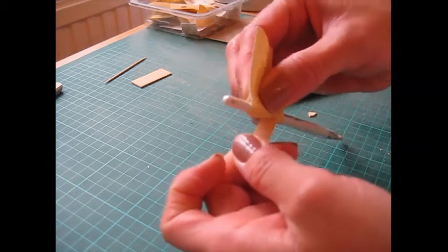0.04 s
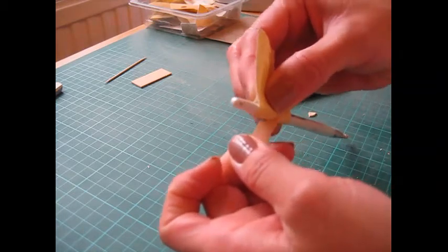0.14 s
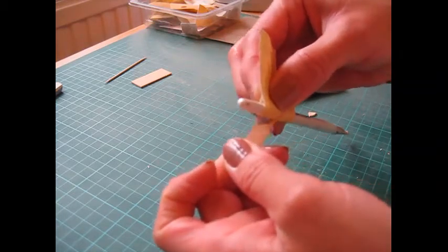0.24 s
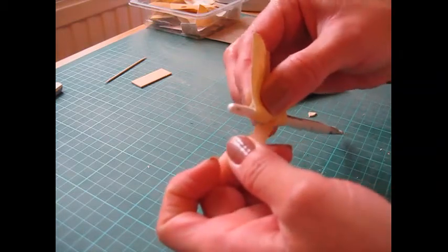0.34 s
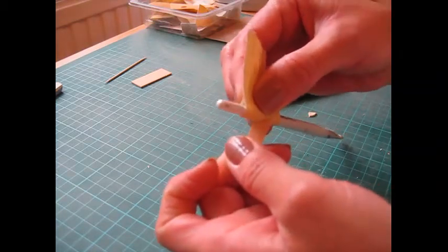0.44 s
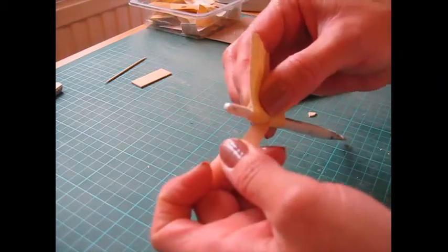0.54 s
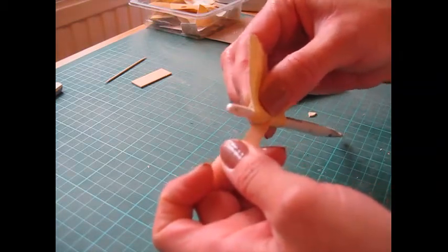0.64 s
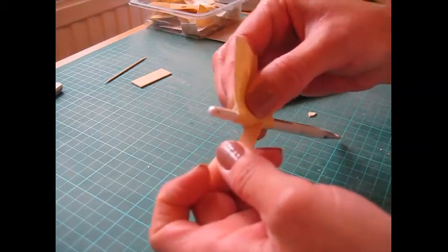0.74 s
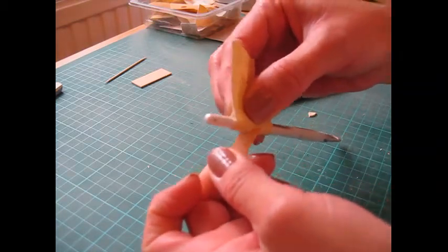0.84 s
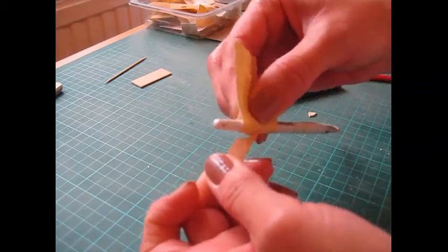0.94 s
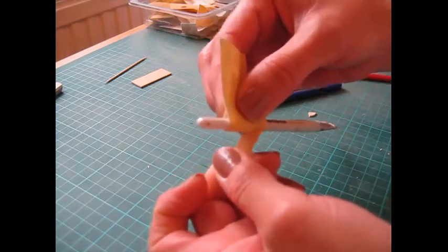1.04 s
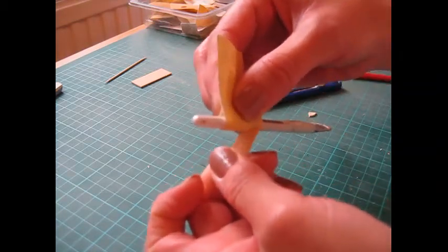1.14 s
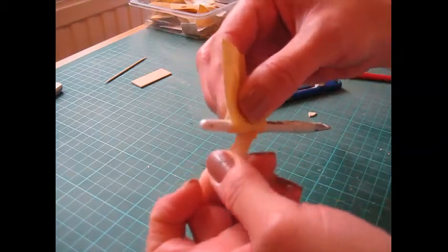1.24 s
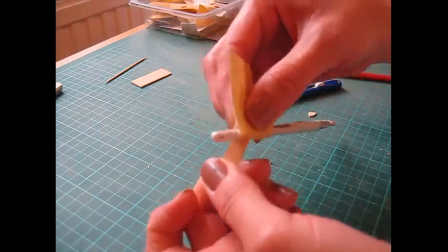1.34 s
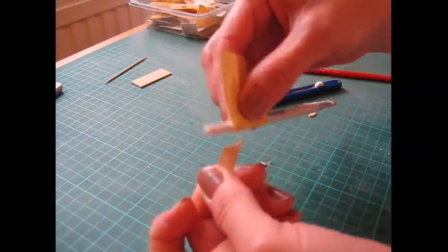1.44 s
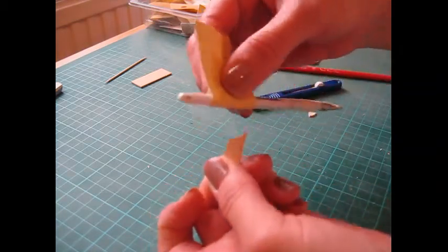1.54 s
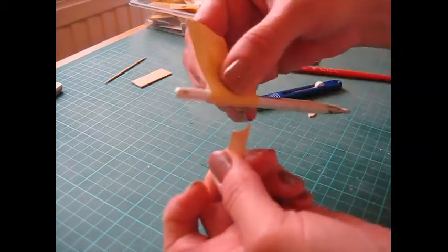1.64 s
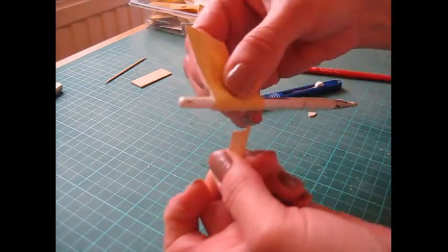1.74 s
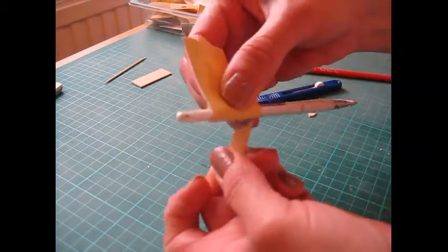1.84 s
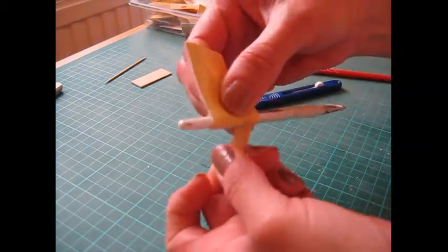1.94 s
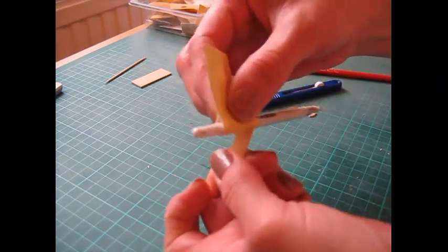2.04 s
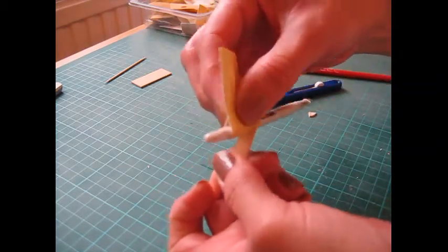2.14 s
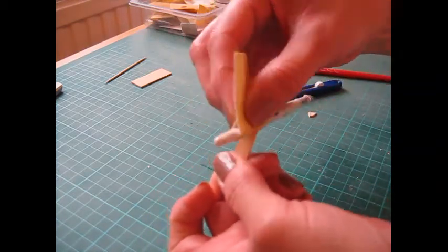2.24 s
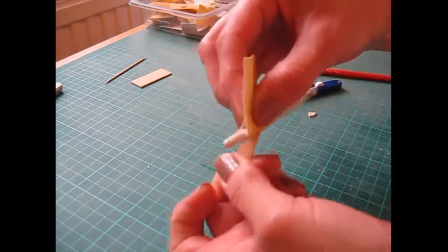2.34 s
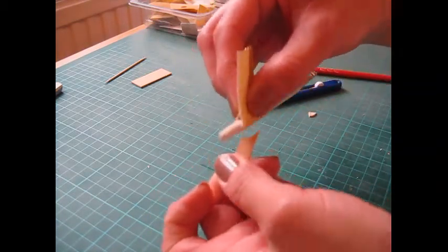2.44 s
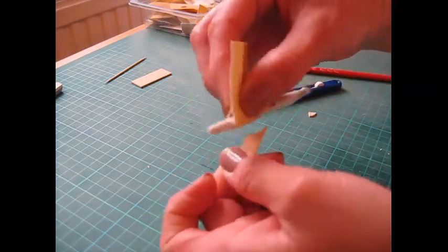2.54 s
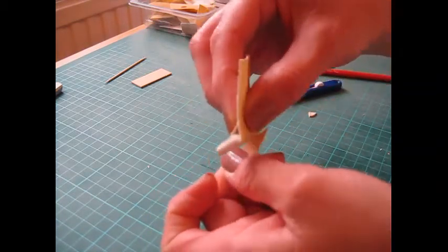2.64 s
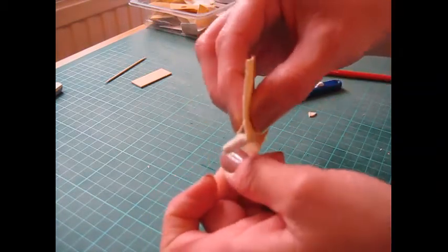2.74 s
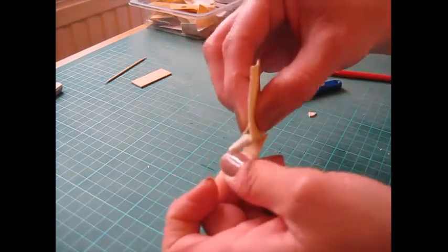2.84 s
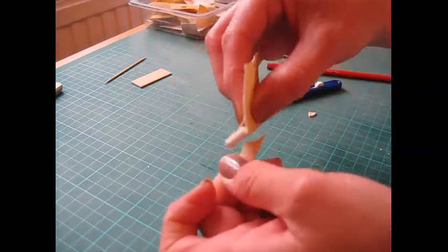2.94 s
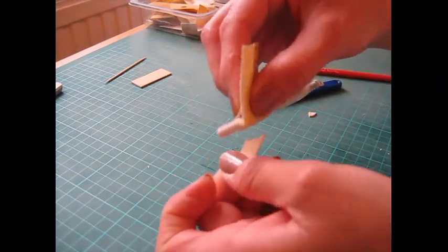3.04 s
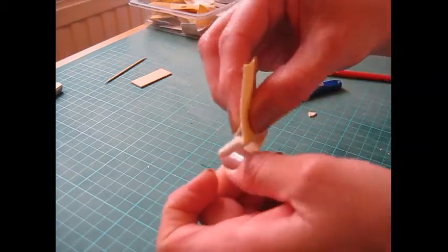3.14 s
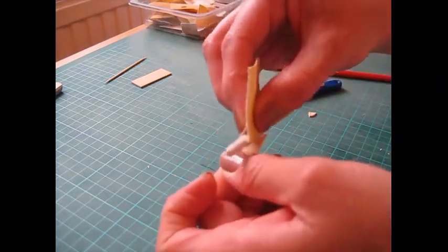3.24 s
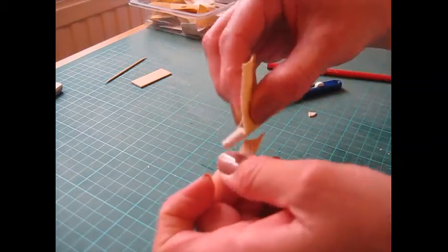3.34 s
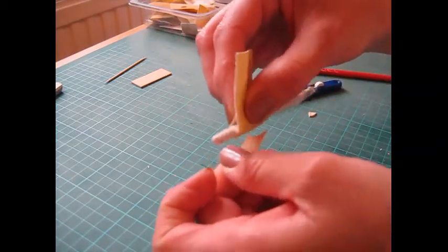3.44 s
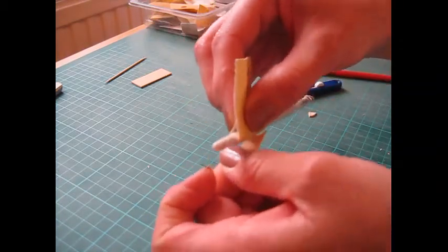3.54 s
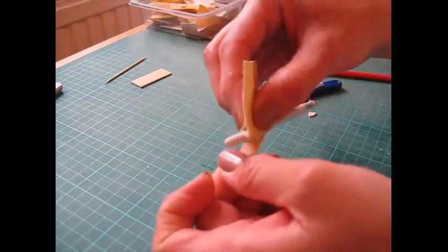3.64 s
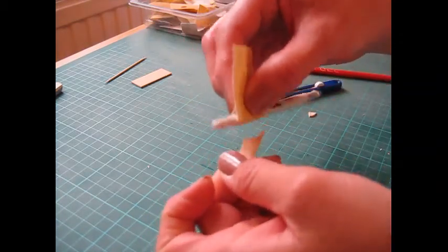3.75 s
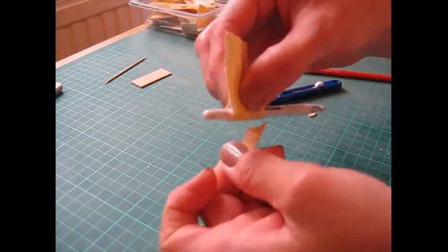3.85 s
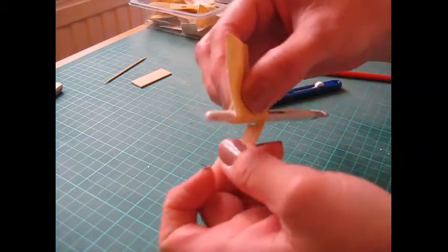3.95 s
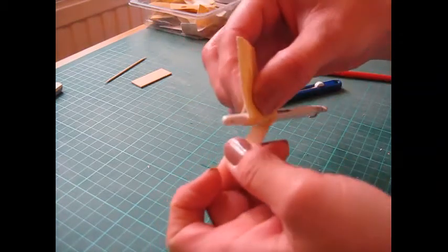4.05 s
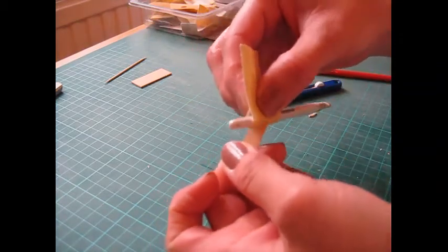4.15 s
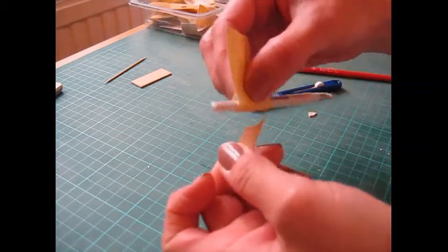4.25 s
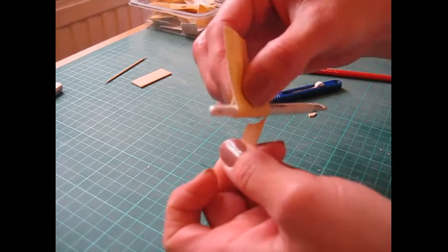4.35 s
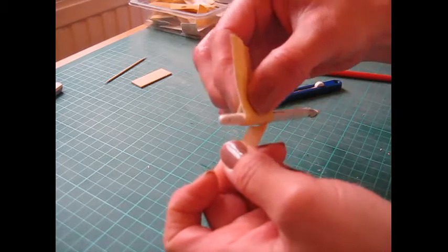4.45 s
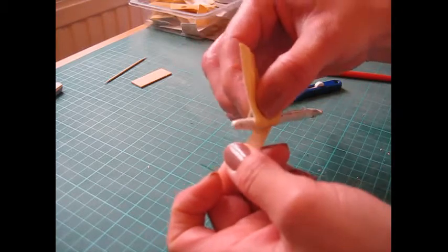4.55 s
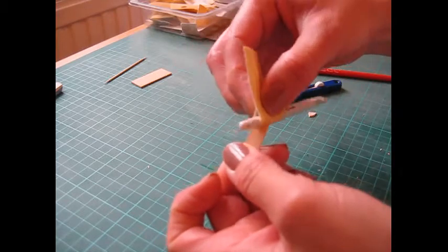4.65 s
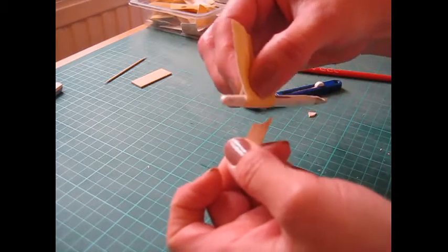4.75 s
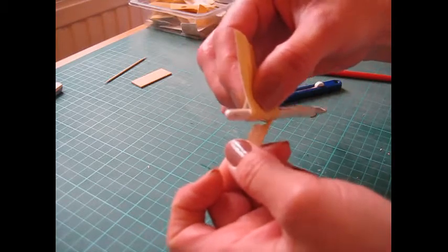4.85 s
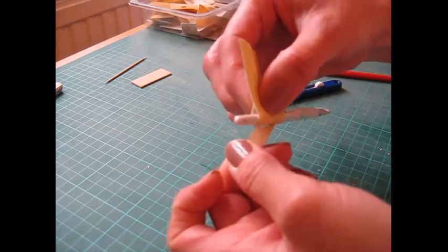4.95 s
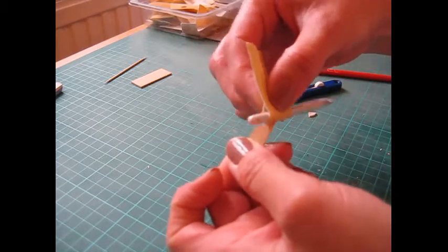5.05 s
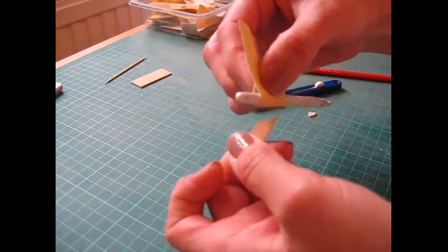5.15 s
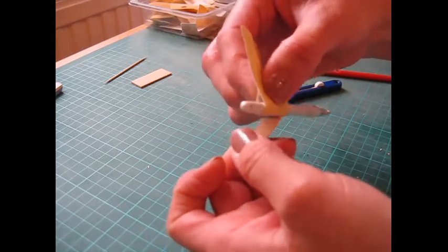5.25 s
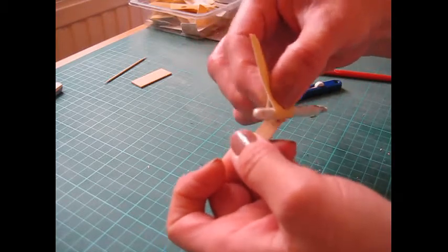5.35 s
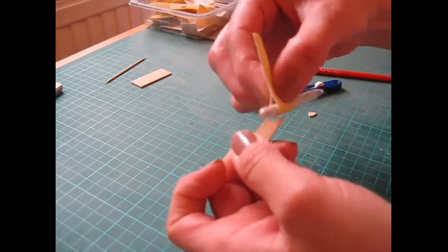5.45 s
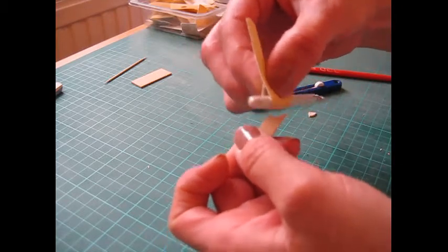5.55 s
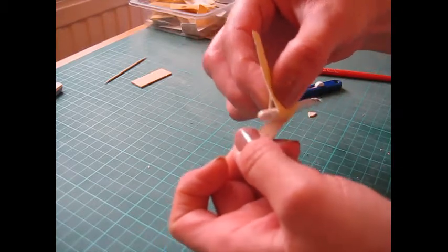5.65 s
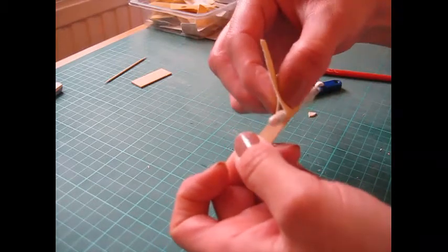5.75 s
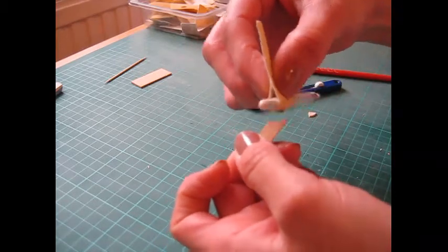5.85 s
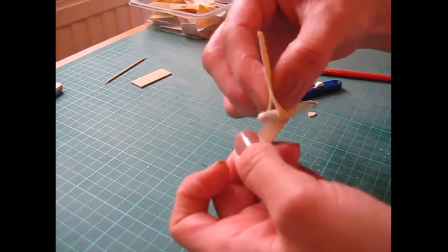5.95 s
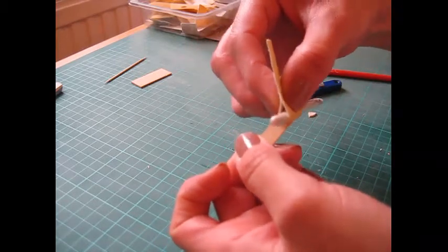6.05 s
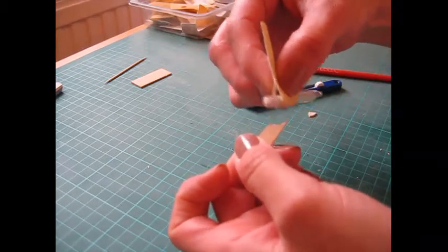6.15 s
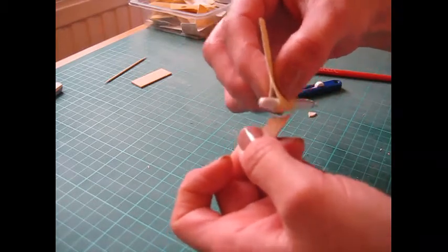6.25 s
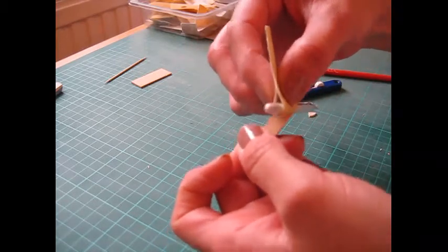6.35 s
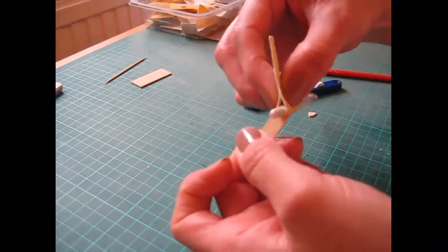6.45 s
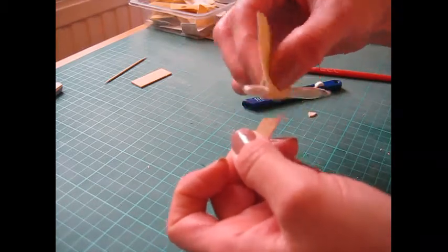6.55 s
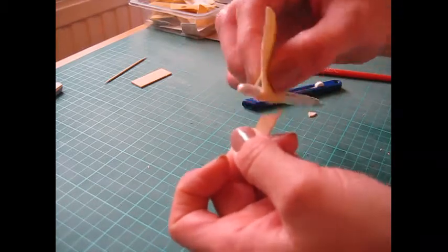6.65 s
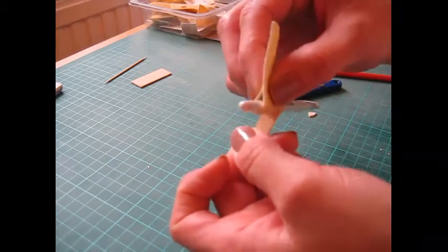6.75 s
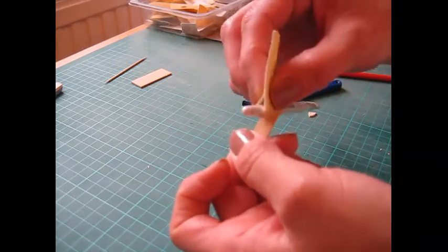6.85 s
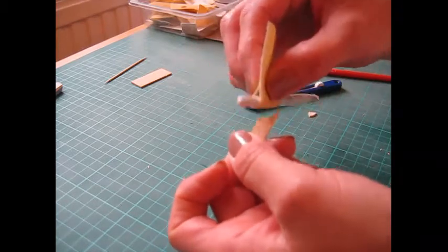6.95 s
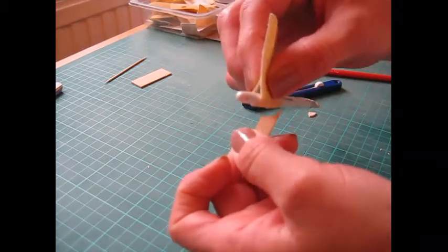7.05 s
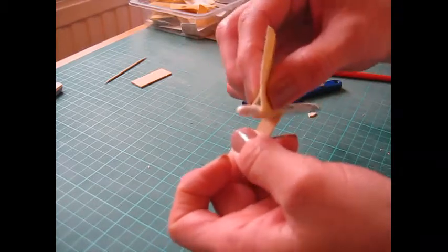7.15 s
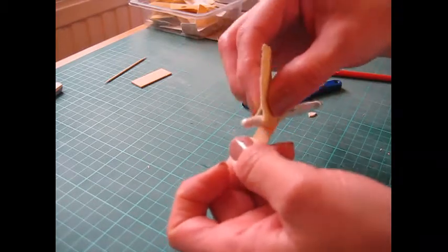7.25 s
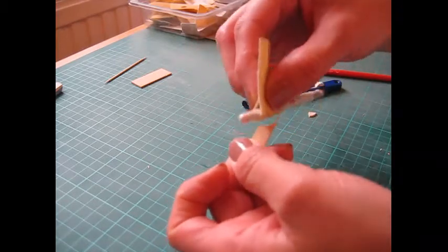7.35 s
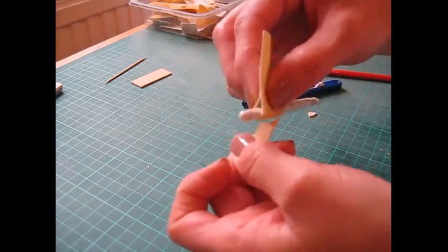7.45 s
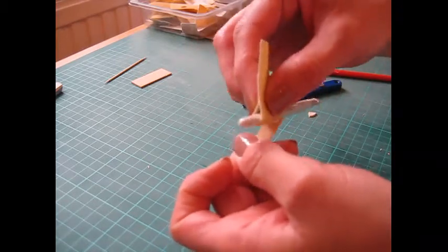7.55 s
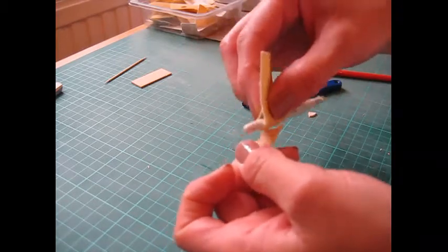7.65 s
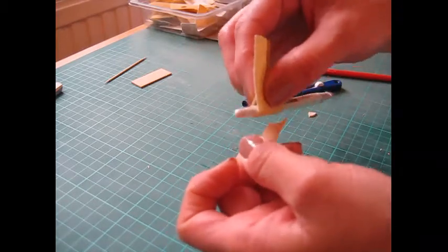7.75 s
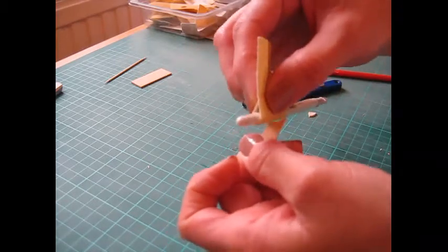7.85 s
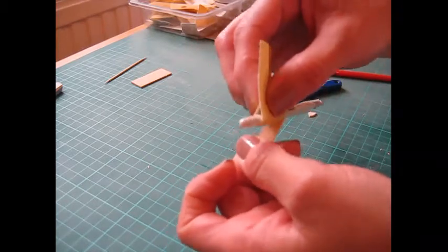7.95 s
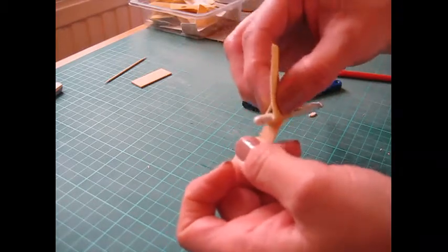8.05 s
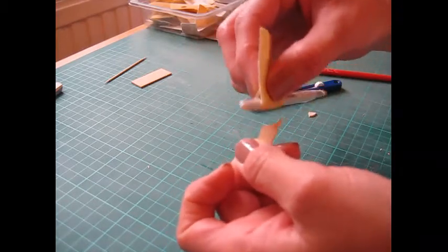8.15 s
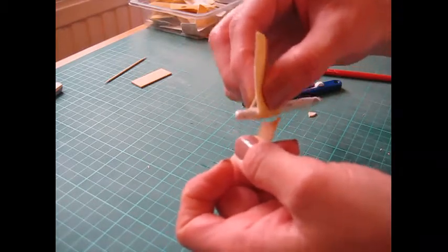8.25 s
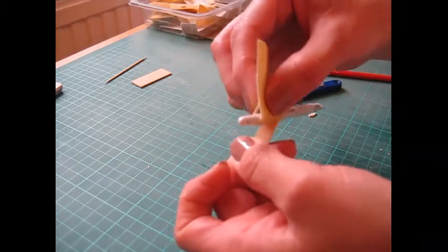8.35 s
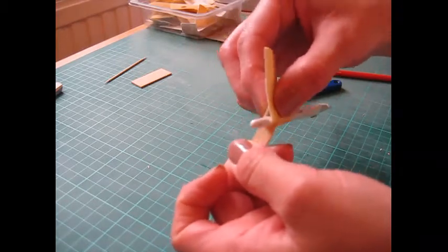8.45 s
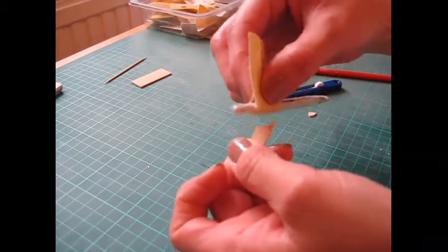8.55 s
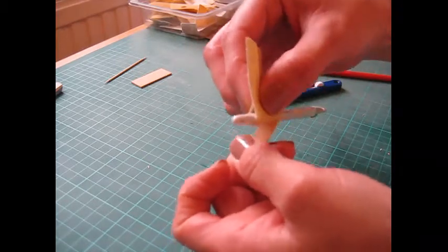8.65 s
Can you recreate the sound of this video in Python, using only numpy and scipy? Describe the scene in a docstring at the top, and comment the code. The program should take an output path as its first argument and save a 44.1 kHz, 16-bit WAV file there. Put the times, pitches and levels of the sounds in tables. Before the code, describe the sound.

Faint, steady room hiss runs throughout, with sanding heard close by in a small, fairly dry room. For the first second, sandpaper dabs lightly at a thin softwood stick in short, hissy touches. Two firmer, gritty strokes come at about 1 and 1.2 seconds, followed by a few tiny brushes until 2 seconds. From there the hand rubs firmly, about two or three short strokes a second, each a bright, dry rasp with a brief gap after it. The paper often snags or judders early in a stroke, with small crackles around 2.3, 4 and 4.4 seconds, then slides smoothly. At about 4.5 seconds the stick gives one soft knock, damped by the fingers. A sharper catch of grit comes near 5.4 seconds. The strokes carry on evenly, each slightly different in tone, until about 8.5 seconds.

```python
"""Faint room hiss, then light dabs of sandpaper on a thin softwood stick, close by in a small room.
Firm hand strokes follow, two or three a second. Fine grit hisses, coarse grains tear fibres, and each
new grip shifts the stick's resonances. The paper often snags or judders early in a stroke, then runs
smoothly. Midway, one soft knock of the stick, damped by the fingers."""
import sys
import numpy as np
from scipy import signal
from scipy.fft import rfft, irfft
from scipy.io import wavfile
from scipy.ndimage import uniform_filter1d

SR = 44100
rng = np.random.default_rng(int(sys.argv[2]) if len(sys.argv) > 2 else 0)


def file_out(sig):
    """Save sig as 16-bit WAV at sys.argv[1]."""
    # one column per channel
    cols = np.atleast_2d(sig).T
    # limit, then scale
    lim = np.clip(cols, -1, 1)
    pcm = np.round(lim * 32767).astype(np.int16)
    wavfile.write(sys.argv[1], SR, pcm)


N = 383229

# Room air and microphone noise: freq_hz, relative_density_db
HISS_SPECTRUM = [(20, -6), (60, -1), (250, 0), (600, -2), (1200, -3.5), (2500, -7.5), (5000, -10.5),
                 (6800, -14), (9500, -15), (13000, -16), (15600, -20)]
# Hand strokes: start_s, length_s, run_up_s, lift_s, level_db, swell_db, coarse_share, body_db,
# low_ring_hz, low_ring_db, high_ring_db, dip_hz, dip_db, bright_db
HAND_STROKES = [(0.097, 0.18, 0.0016, 0.0076, -44.5, -10, .25, 6.5, 3810, 3, 5, 3510, -8, 10),
                (0.311, 0.12, 0.023, 0.023, -35, -19, .25, 10.5, 4550, 8, 5.5, 5200, -7, 15.5),
                (0.479, 0.14, 0.011, .015, -44.5, -15, 0, 5, 4080, 2, 2, 2930, -7, 11),
                (0.667, 0.081, 0.012, 0.011, -44.5, -14, 0.1, 6.5, 4200, 1.5, -2, 2870, -7, 4.5),
                (0.807, .14, 0.039, 0.01, -39.5, -1, 0.4, -2, 4550, -12, 0, 2860, -12, 2.5),
                (0.98, 0.11, 0.0045, 0.0095, -28.5, 15, 0.46, 6, 2540, -2, 0, 3400, -1, 5.5),
                (1.179, 0.22, 0.041, 0.0075, -25, 3.5, 0.33, -5, 2940, 3, 0, 4020, -4.5, -4),
                (1.397, .038, .001, .006, -48, -4, 0.3, 0, 2920, -2, 0, 3950, -3.5, -4),
                (1.633, 0.038, 0.0065, 0.013, -34, -2, 0, 1, 4320, 8, 4, 3260, -4, -10),
                (1.938, 0.033, 0.01, 0.0043, -40.5, 7, .3, 3, 4700, 3, 1, 3340, -5, -3),
                (2.127, 0.19, 0.00089, .008, -39, 16, .6, -6, 2790, 1.5, 4.5, 2410, -5, -9.5),
                (2.309, 0.12, 0.029, 0.0086, -27, 0, 0.56, -6.5, 2790, 6, 1.5, 2370, -8, -2.5),
                (2.657, .09, 0.0087, 0.022, -36, 3, 0.4, 2, 4530, 12, 9, 2960, -10, -3),
                (2.754, 0.19, .028, 0.0037, -28.5, -2.5, 0.17, -2, 4300, 7, 6, 2780, -6.5, 4.5),
                (3.171, .2, 0.026, 0.016, -28.5, 4, 0.27, 4, 4400, 11.5, 6.5, 2820, -2, 11),
                (3.544, 0.18, 0.011, 0.0068, -31, 5, .17, 1, 4200, 11.5, 5, 5400, -3.5, 7.5),
                (3.952, 0.26, 0.097, 0.0072, -26, -3, 0.44, -5.5, 2834, 10, 0, 2600, -8, 3),
                (4.431, 0.25, .072, .015, -25.5, 6, 0.38, -6, 2880, 6, 1.5, 2510, -5.5, 2.5),
                (4.899, 0.19, 0.012, 0.0096, -24.5, 5, 0.28, -8.5, 2430, 10, 0.5, 2410, -13.5, 6),
                (5.295, 0.16, 0.018, 0.014, -24, 0.5, .35, 0, 2670, 9.5, 1, 2400, -14, 13),
                (5.636, 0.15, .001, 0.0084, -25, -4.5, .3, 1, 2640, 3.5, 4.5, 2430, -5.5, 12),
                (5.957, .17, .012, 0.012, -25, 0.5, 0.13, -4, 2860, 4.5, 1, 4220, -1, 11),
                (6.308, 0.18, 0.0054, 0.0091, -24.5, 1, 0.22, -4.5, 2880, 2.5, 1, 3900, -3, 5.5),
                (6.705, .22, 0.042, 0.01, -28, 9, 0.44, -1, 2930, 7.5, 1, 3200, -7.5, 4.5),
                (7.128, 0.2, 0.0062, 0.019, -27, 5, 0.06, 2.5, 3250, 9, 0, 3300, -11, 3.5),
                (7.468, 0.047, 0.0051, .01, -46.5, 2, 0.5, -1, 4700, 1, 3, 3210, -16, -6),
                (7.515, 0.18, 0.005, 0.01, -26, 3.5, 0.35, 2.5, 2190, 2.5, 2, 5200, -1.5, 9.5),
                (7.899, 0.21, 0.017, 0.014, -26.5, 4.5, 0.29, -8, 2280, 4.5, 0, 2670, -6, 0.5),
                (8.314, .19, 0.013, 0.014, -26.5, 9, 0.24, -7.5, 2010, 5.5, 2, 2450, -4, 1)]
# Grit on wood: freq_hz, relative_density_db
RASP_SPECTRUM = [(100, -40), (400, -36.5), (750, -22), (1150, -18), (1700, -9), (2250, -6.5), (2630, -9.5),
                 (3000, -4), (3700, 0.7), (4400, -3.5), (6000, -1), (7200, -7), (10000, 0), (13000, -2.5),
                 (15600, -5.5)]
# Room decay: freq_hz, t60_s
ROOM_DECAY = [(500, 0.12), (3000, 0.25), (8000, 0.16), (16000, 0.14)]
# Hard catches of single grits, light touches between strokes: start_s, level_db (over 1 ms)
GRIT_SNAGS = [(0.388, -25), (0.9881, -26), (1.0152, -28), (1.026, -20), (1.0685, -22), (2.05, -38.5),
              (2.0898, -37), (2.1357, -23), (2.1924, -29), (2.1952, -24.5), (2.2967, -20.5), (2.303, -26),
              (2.319, -23), (2.3281, -18), (2.7543, -27), (3.1632, -38), (3.9543, -21), (3.9703, -16.5),
              (4.4294, -23), (4.4459, -17.5), (4.8985, -18), (5.2384, -46), (5.3032, -25.5),
              (5.3674, -13.5), (5.905, -43), (6.3165, -25), (6.7565, -34), (7.0986, -44), (7.2771, -22),
              (7.8972, -42), (8.2802, -40), (8.6454, -47)]
# Stick-slip runs of the paper: start_s, length_s, first_snag_db, last_snag_db
PAPER_JUDDERS = [(0.392, 0.036, -28.5, -42), (0.725, 0.047, -33, -36.5), (1.072, .028, -20, -32.5),
                 (1.179, 0.034, -54, -20), (2.144, 0.029, -33, -25), (2.207, 0.062, -27, -23),
                 (2.335, .02, -23, -23), (3.960, 0.029, -25, -22.5), (3.989, 0.037, -39, -51),
                 (4.433, 0.088, -24.5, -22)]
# Knock of the stick: start_s, peak_db
STICK_KNOCKS = [(4.4581, -32.5)]
# Modes of the held stick: pitch_hz, relative_db, t60_s
STICK_MODES = [(190.4, -19, 0.026), (476, 0, 0.0071), (870, 13, 0.0042)]

RUN_UP_DB, RUN_UP_COARSE, RAMP_S = -13.5, 0.54, 0.0059
ARCH_DB, LIFT_DB = 0.5, -44
BODY_TURN_DB, BODY_SWELL_DB = 9, 1
HIGH_RING_HZ, FIRM_DB, SHEEN_DB_PER_DB = 6510, -23.5, 0.27
BAND_EDGE_HZ = 15850


def gain_of(db):
    """Decibels to amplitude."""
    return 10 ** (np.asarray(db) / 20)


def unit_rms(x):
    """Scale to rms 1."""
    return x / np.sqrt(np.mean(x ** 2) + 1e-20)


def curve_at(points, hz):
    """Interpolate (freq_hz, value) points over log frequency."""
    freq_hz, value = np.transpose(points)
    return np.interp(np.log(hz + 1), np.log(freq_hz + 1), value)


def add(mix, start_s, sound):
    """Mix in at start_s."""
    part = mix[max(round(start_s * SR), 0):][:len(sound)]
    part += sound[:len(part)]


def bell(hz, centre_hz, width_hz):
    """Resonance curve, height 1."""
    return 1 / (1 + (2 * (hz - centre_hz) / width_hz) ** 2)


def impulse_response(spectrum_db):
    """Minimum phase, unit energy."""
    log_gain = np.log(gain_of(np.r_[spectrum_db, spectrum_db[-2:0:-1]]))
    response = np.fft.ifft(np.exp(np.conj(signal.hilbert(log_gain)))).real
    return response / np.linalg.norm(response)


def hiss(rms_db=-55.5):
    """Steady room air and microphone noise."""
    colour = gain_of(curve_at(HISS_SPECTRUM, np.fft.rfftfreq(N, 1 / SR)))
    return gain_of(rms_db) * unit_rms(irfft(rfft(rng.standard_normal(N)) * colour, N))


def hand_motion():
    """Each stroke runs up quieter and coarser, slides fastest midway, fades on lift-off."""
    contact, coarse_share, body_db = np.zeros((3, N))
    for start_s, length_s, run_up_s, lift_s, level_db, swell_db, coarse, wood_db, *_ in HAND_STROKES:
        t = np.arange(0, length_s, 1 / SR)
        along = t / length_s - 0.5
        run_up = (1 - np.tanh((t - run_up_s) / (2 * RAMP_S))) / 2
        lift = np.exp((t - length_s) / max(lift_s, 1 / SR))
        speed = np.cos(np.pi * along)
        slide_db = level_db + swell_db * along + ARCH_DB * (speed - speed.mean())
        add(contact, start_s, gain_of(slide_db + RUN_UP_DB * run_up + LIFT_DB * lift))
        add(coarse_share, start_s, coarse + RUN_UP_COARSE * (run_up - run_up.mean()))
        # wood lows come out at both turns of the hand
        add(body_db, start_s, wood_db + BODY_TURN_DB * (2 * along) ** 2 + BODY_SWELL_DB * along)
    return contact, np.clip(coarse_share, 0, 1), body_db


def friction(contact, coarse_share, grains_per_s=1200, spread_db=7.0, grain_s=0.0001, size=64):
    """Countless fine scratches hiss; coarse grains tear fibres one by one."""
    strength = gain_of(spread_db * np.clip(rng.standard_normal(N), -2, 2))
    hits = strength * (rng.random(N) < grains_per_s / SR)
    power_decay = np.exp(-2 * np.arange(size) / SR / grain_s)
    tearing = np.sqrt(np.convolve(hits ** 2, power_decay)[:N])
    grains = unit_rms(tearing * rng.standard_normal(N))
    scratches = rng.standard_normal(N)
    return contact * (np.sqrt(coarse_share) * grains + np.sqrt(1 - coarse_share) * scratches)


def stick_resonance(drive, ring_width_hz=900, dip_width_hz=500, sheen_hz=10500, sheen_width_hz=2600,
                    ripple_db=3.5, overlap_hz=11000, glide=0.025, tip_hz=3900, tip_glide=0.051,
                    size=1024, places=5):
    """Stick and paper colour each stroke; resonances sink as the contact slides, most near the tip."""
    hz, out = np.fft.rfftfreq(size, 1 / SR), np.zeros(N)
    ends_s = [stroke[0] for stroke in HAND_STROKES[1:]] + [N / SR]
    for stroke, end_s in zip(HAND_STROKES, ends_s):
        start_s, _, _, _, level_db, _, _, _, low_hz, low_db, high_db, dip_hz, dip_db, bright_db = stroke
        push = drive[round(start_s * SR):round(end_s * SR)]
        travel = np.cumsum(push ** 2) / (np.sum(push ** 2) + 1e-20)
        sheen_db = SHEEN_DB_PER_DB * (FIRM_DB - level_db)  # lighter touch, more paper sheen
        colour_db = curve_at(RASP_SPECTRUM, hz) + bright_db * hz / BAND_EDGE_HZ
        colour_db += high_db * bell(hz, HIGH_RING_HZ, ring_width_hz)
        colour_db += dip_db * bell(hz, dip_hz, dip_width_hz)  # antiresonance
        colour_db += sheen_db * bell(hz, sheen_hz, sheen_width_hz)
        # weak modes change per grip, overlap and even out in the treble
        ripple = unit_rms(uniform_filter1d(rng.standard_normal(len(hz)), size=5))
        colour_db += ripple_db / (1 + (hz / overlap_hz) ** 2) * ripple
        for place in np.linspace(0, 1, places):
            crossfade = np.maximum(1 - abs(travel - place) * (places - 1), 0)
            early = 1 - 2 * place
            ring_hz = low_hz * (1 + tip_glide * early * (low_hz > tip_hz))
            ring_db = low_db * bell(hz, ring_hz, ring_width_hz)
            shifted_db = np.interp(hz / (1 + glide * early), hz, colour_db + ring_db)
            add(out, start_s, signal.fftconvolve(crossfade * push, impulse_response(shifted_db)))
    return out


def wood_body(x, body_db, corner_hz=2200):
    """The wood's lows, set per stroke: fuller in light dabs and at each stroke's start and end."""
    lows = signal.sosfiltfilt(signal.butter(2, corner_hz, fs=SR, output="sos"), x)
    return x + (gain_of(body_db) - 1) * lows


def room_tail(x, build_s=0.0014):
    """Short diffuse tail, longest near 3 kHz."""
    hz, t, noise = signal.stft(rng.standard_normal(SR // 2), SR, nperseg=256)
    decay = gain_of(-60 * t / curve_at(ROOM_DECAY, hz)[:, None])
    tail = signal.istft(noise * decay, SR, nperseg=256)[1]
    tail *= 1 - np.exp(-np.arange(len(tail)) / SR / build_s)
    return signal.fftconvolve(x, tail / np.linalg.norm(tail))[:N]


def snags(crumble_gain=0.54, crumble_s=0.00092, size=128):
    """Caught grit: one sharp release, then crumbling fibres."""
    out, t = np.zeros(N), np.arange(size) / SR
    fibres = rng.standard_normal(N)[:N // size * size].reshape(-1, size)
    samples_per_ms = SR / 1000
    for (start_s, level_db), noise in zip(GRIT_SNAGS + judders(), fibres):
        snap = (t == 0) + crumble_gain * noise * np.exp(-t / crumble_s)
        add(out, start_s, gain_of(level_db) * np.sqrt(samples_per_ms) * snap / np.linalg.norm(snap))
    return out


def judders(slip_s=0.0052, unevenness=0.48, spread_db=2.5, max_slips=32):
    """Paper catches and slips in quick, uneven runs. Returns snags: start_s, level_db."""
    slips = []
    jitter = rng.uniform(-1, 1, (len(PAPER_JUDDERS), 2, max_slips))
    for (start_s, length_s, first_db, last_db), (gap_jitter, level_jitter) in zip(PAPER_JUDDERS, jitter):
        waits_s = slip_s * (1 + unevenness * gap_jitter)
        t = np.cumsum(waits_s) - waits_s[0]
        level_db = first_db + (last_db - first_db) * t / length_s + spread_db * level_jitter
        slips += zip(start_s + t[t < length_s], level_db[t < length_s])
    return slips


def knock(size=2048):
    """Low stick modes, damped at once by the fingers."""
    out, t = np.zeros(N), np.arange(size) / SR
    thud = sum(gain_of(db - 60 * t / t60_s) * np.sin(2 * np.pi * hz * t) for hz, db, t60_s in STICK_MODES)
    for start_s, peak_db in STICK_KNOCKS:
        add(out, start_s, gain_of(peak_db) * thud / abs(thud).max())
    return out


def scene(room_db=-18):
    """Close sanding, faint room tail, hiss. Mono."""
    contact, coarse_share, body_db = hand_motion()
    drive = friction(contact, coarse_share) + snags()
    sanding = wood_body(stick_resonance(drive), body_db) + knock()
    return (sanding + gain_of(room_db) * room_tail(sanding) + hiss())[None]


def record(dry, notch_hz=7900, notch_q=5.5):
    """Small camera's response: deep treble notch, steep band limit."""
    notched = signal.lfilter(*signal.iirnotch(notch_hz, notch_q, fs=SR), dry)
    lowpass = signal.firwin(511, BAND_EDGE_HZ, window=("kaiser", 8), fs=SR)
    return signal.oaconvolve(notched, lowpass[None], "same")


dry = scene()
out = record(dry)
file_out(out)
```